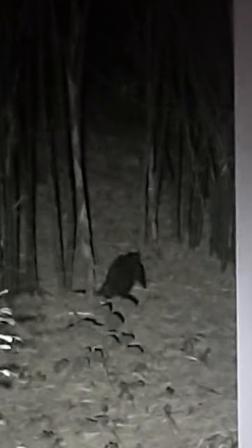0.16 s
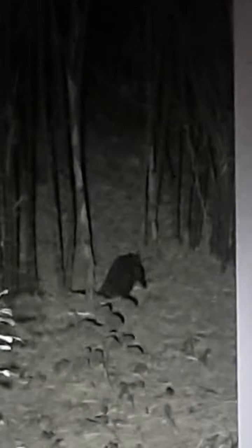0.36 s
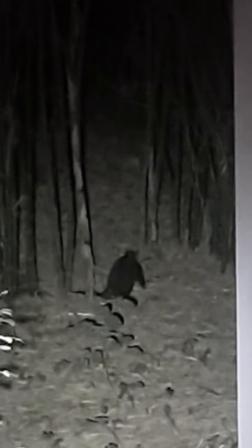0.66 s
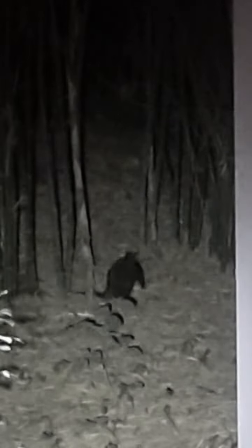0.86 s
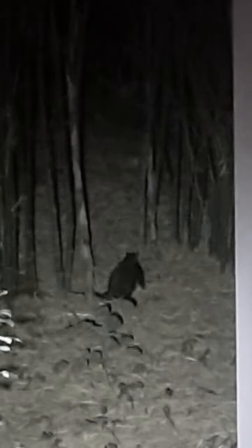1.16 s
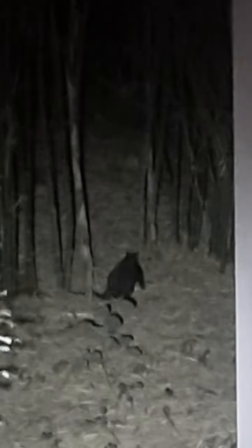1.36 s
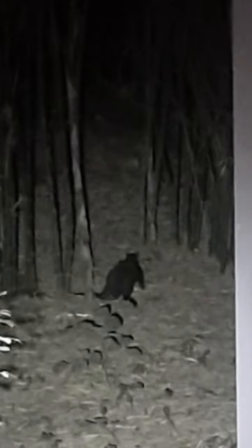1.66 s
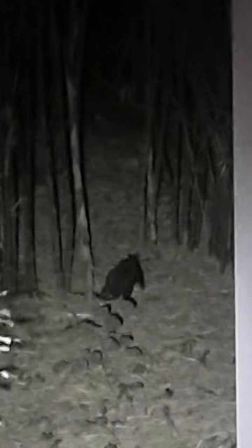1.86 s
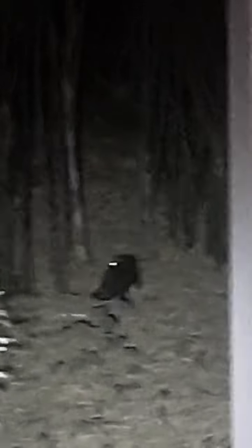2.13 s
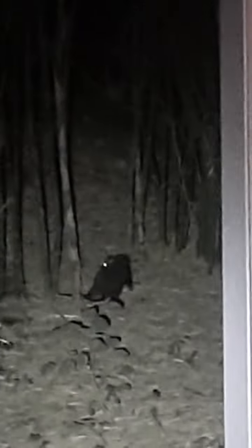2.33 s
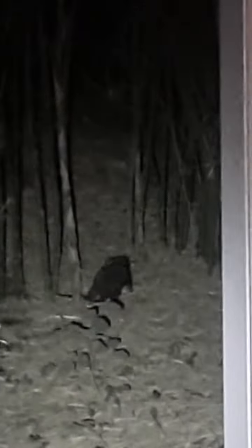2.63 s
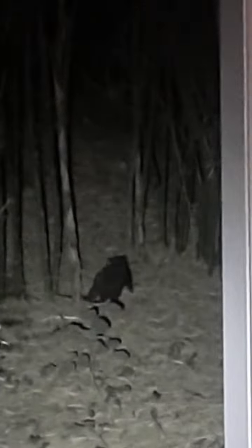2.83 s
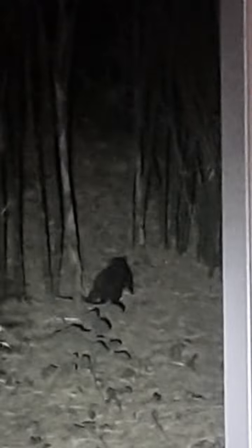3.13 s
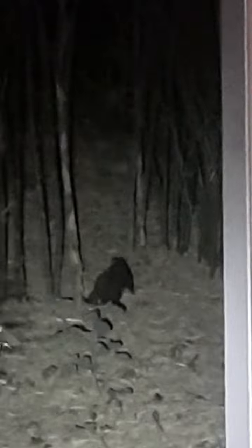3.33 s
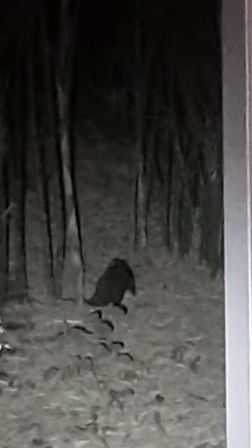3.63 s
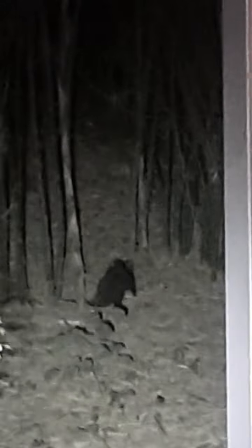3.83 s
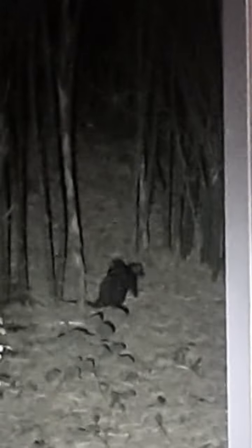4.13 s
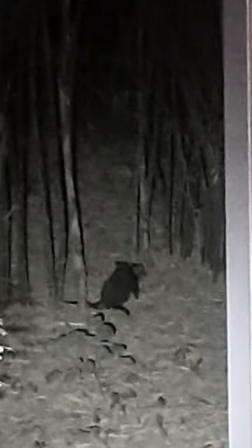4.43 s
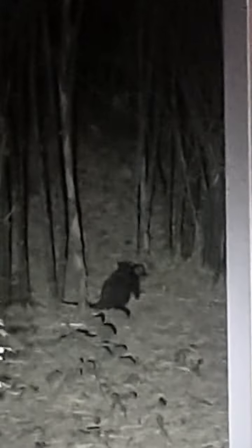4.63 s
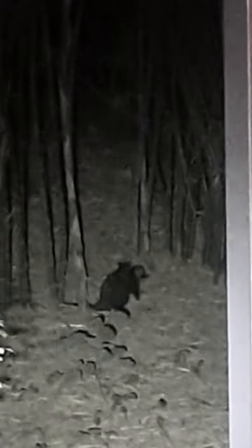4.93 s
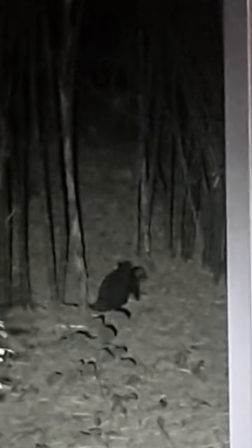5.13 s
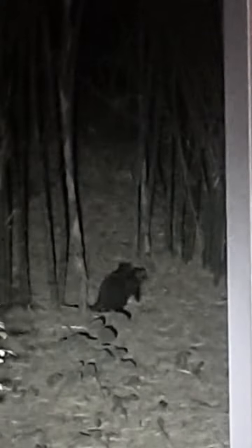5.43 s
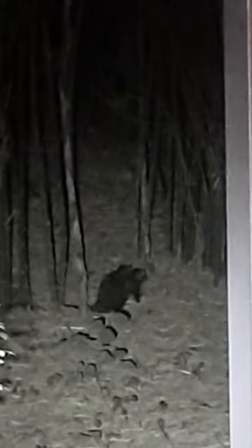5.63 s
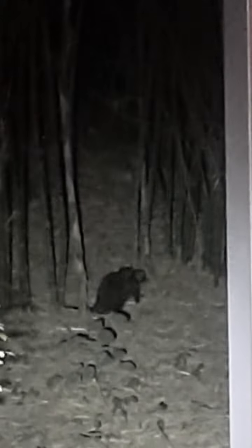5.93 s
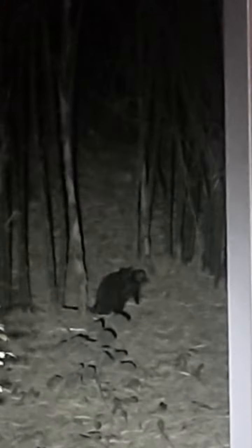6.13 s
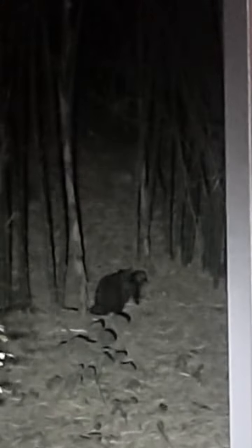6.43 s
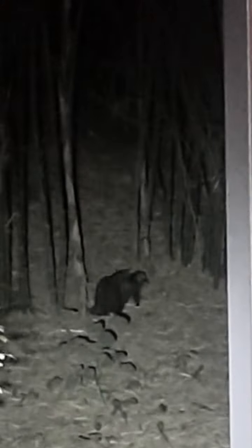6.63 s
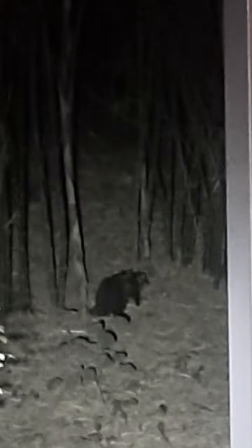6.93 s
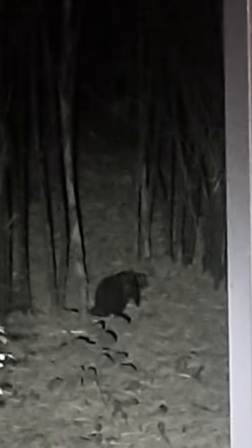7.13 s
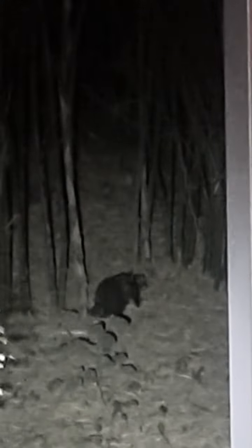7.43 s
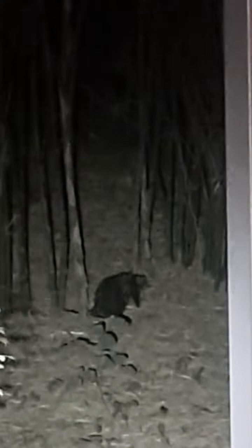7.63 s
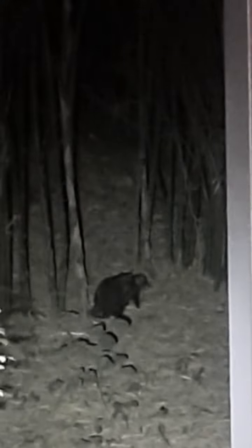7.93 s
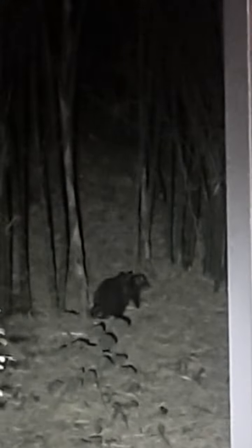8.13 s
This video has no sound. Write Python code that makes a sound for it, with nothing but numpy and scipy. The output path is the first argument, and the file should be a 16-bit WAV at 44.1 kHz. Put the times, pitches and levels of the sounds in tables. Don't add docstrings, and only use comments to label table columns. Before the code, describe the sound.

Outdoors at night, a small animal utters high, clear, warbling squeaks: first a few separate short calls with pauses, then a long, louder chatter near the end. Each yelp scoops upward and drops, echoing softly off the trees. Behind it are low distant traffic rumble and tyre hiss, faint steady insects and an occasional rustle of leaves. A handheld stereo microphone hears it at some distance.

```python
import sys
import numpy as np
from scipy import signal
from scipy.fft import rfft, irfft, next_fast_len
from scipy.io import wavfile
from scipy.ndimage import uniform_filter1d

SR = 44100
rng = np.random.default_rng(int(sys.argv[2]) if len(sys.argv) > 2 else 0)


def store_pcm(level_fs):
    pcm = np.round(np.clip(level_fs, -1, 1) * 32767).astype(np.int16)
    wavfile.write(sys.argv[1], SR, np.atleast_2d(pcm).T)


def level_to_linear(level):
    exponent = np.asarray(level, float) / 20
    return 10 ** exponent


N = 364707

# (time [s], roar level [dB], nearness as treble gain [dB])
ROAD_SWELLS = [(0.0, -71.5, -5.5), (0.14, -62, -2.5), (0.87, -71, 5.5), (1.06, -64, -2), (1.38, -68, 6),
               (1.77, -58, 3), (2.49, -62.5, -5.5), (2.74, -57.5, -5.5), (2.85, -64, 6.5),
               (2.97, -57.5, -12.5), (3.27, -67.5, -3), (3.38, -59, -15), (4.28, -55, -8.5),
               (5.13, -66.5, -8), (5.69, -58.5, -10), (7.58, -58.5, -14), (7.76, -63, -9.5),
               (8.27, -69, -6)]
# (frequency [Hz], density [dB per Hz])
ENGINE_RUMBLE = [(18, -17), (30, -10), (48, -2.5), (65, -2.5), (91, -6.5), (160, -19.5), (210, -78),
                 (350, -120)]
TYRE_DRONE = [(88, -15), (150, 0.5), (312, 3.5), (372, -3), (420, -2.5), (550, -33.5), (920, -120)]
TYRE_ROAR = [(250, -36), (430, -7), (538, 2), (684, -2), (790, -6.5), (880, -11), (1140, -25), (1940, -120)]
TYRE_HISS = [(530, -15.5), (900, -0.5), (1160, -1.5), (1260, -3.5), (1580, -2.5), (2300, -17),
             (2990, -62.5), (5060, -120)]
# (frequency [Hz], ring t60 [s], level [dB])
IDLE_HUM = (49, 1.6, -66.5)
# (time [s], length [s], depth [dB])
LULLS = [(0.284, 0.02, -13), (.72, 0.23, -4.5), (1.215, 0.076, -11.5), (1.47, 0.09, -13),
         (2.121, 0.035, -9), (2.537, 0.17, -9.5), (2.996, 0.058, -8), (3.301, 0.055, -7), (3.816, 0.58, -4),
         (5.105, 0.033, -13), (6.047, 0.094, -12), (6.316, .06, -8), (7.08, 0.083, -8.5),
         (8.27, 0.067, -9.5)]
# (time [s], length [s], swell [dB])
LORRY = (2.98, 1.14, 4.8)
ENGINE_DB, DRONE_DB = -53.5, -67
DRONE_PER_ROAR, DRONE_PER_NEAR, DRONE_PER_LULL = 0.46, 0.1, 0.37

# (frequency [Hz], density [dB per Hz])
NIGHT_SPECTRUM = [(1120, -26), (1900, -15.5), (2290, -15.5), (2900, -9.5), (3200, -18), (3820, -4),
                  (3980, -25.5), (4110, -9.5), (4360, -56), (5110, -25), (5910, -18.5), (6440, -8),
                  (7440, -1), (8220, -12), (9190, -21), (11900, -65), (20200, -120)]
NIGHT_DB = -66
# (centre [Hz], spread [Hz], pulse rate [per s], ring t60 [s], level [dB])
CHORUSES = [
    (6980, 550, 37, 0.071, -78),
    (3554, 190, 27, 0.06, -79),
    (2815, 130, 46, 0.022, -80.5),
]
# (time [s], length [s], level [dB])
HIGH_CHIRPS = [(.09, 0.16, -88), (.83, 0.17, -84), (1.48, 0.12, -84.5), (2.426, 0.17, -92),
               (3.2, 0.11, -91), (3.96, 0.14, -88), (4.618, .13, -87), (5.358, .13, -88), (5.97, .12, -110),
               (6.62, 0.32, -80), (7.298, 0.087, -95), (8.03, 0.16, -88)]
# (time [s], length [s], level [dB])
RUSTLES = [
    (4.15, 0.64, -64),
    (5.3, 0.81, -60),
    (6.28, 0.023, -78),
]
# (frequency [Hz], density [dB per Hz])
LEAF_SPECTRUM = [(1200, -47), (1800, 7), (2600, 3), (3400, 2), (5000, -8), (6500, -36)]

# (frequency [Hz], gain [dB])
THROAT = [(1200, -50), (1850, -23.5), (2150, -14), (2700, -14), (3200, -8.5), (3750, 2), (4400, 1),
          (4750, -11), (5500, -3), (6050, -5.5), (7620, -6.5), (9100, -34.5), (9900, -44), (11500, -56),
          (15000, -55)]
# (time [s], climb length [s], start pitch [Hz], crest
# pitch [Hz], level [dB])
YELPS = [(.7, 0.057, 1697, 2164, -49), (.79, 0.082, 1733, 2107, -41.5),
         (.945, 0.069, 1257, 1816, -41.5), (1.587, 0.033, 1545, 1676, -50),
         (1.636, 0.045, 1752, 2264, -44), (1.7, 0.021, 2083, 2080, -39.5),
         (1.755, 0.021, 1990, 1884, -38), (1.788, .018, 1780, 1655, -39),
         (1.819, 0.052, 1387, 1812, -36), (1.999, .12, 1066, 1225, -50),
         (2.612, .035, 1420, 1648, -53), (2.642, 0.044, 1725, 2197, -42.5),
         (2.757, 0.07, 1496, 2052, -39), (2.875, .07, 1120, 1250, -45),
         (2.981, 0.054, 1070, 1167, -46.5), (3.061, 0.069, 1108, 1328, -48),
         (4.467, 0.05, 1368, 2101, -39.5), (5.486, 0.064, 1345, 2039, -40),
         (5.578, 0.022, 1873, 1713, -36.5), (5.623, 0.062, 1660, 1917, -34.5),
         (5.705, .018, 1494, 1393, -44.5), (5.778, 0.069, 1078, 1316, -47.5),
         (6.4, 0.084, 1245, 1937, -42), (6.507, 0.081, 1767, 1847, -33.5),
                 (6.644, 0.072, 1256, 1817, -35), (6.791, 0.071, 1160, 1838, -36.5),
                 (6.902, 0.096, 1460, 1887, -35.5), (7.04, 0.1, 1290, 1890, -35.5),
                 (7.227, 0.074, 1115, 1375, -44), (7.299, .035, 1449, 1460, -38.5),
                 (7.337, 0.056, 1473, 1655, -40), (7.48, 0.08, 1534, 1895, -34),
                 (7.672, 0.077, 1299, 1892, -32), (7.804, 0.078, 1428, 1920, -31),
                 (7.922, 0.028, 1296, 1225, -39), (7.963, .065, 1228, 1322, -39.5)]
# (time [s], pitch [Hz], level [dB])
CALL_ENDS = [
    (1.06, 1046, -43),
    (2.155, 1250, -85),
    (2.735, 1630, -64),
    (3.201, 1007, -93),
    (4.575, 1436, -69),
    (5.919, 1137, -74),
    (7.655, 1086, -73),
    (8.13, 1102, -60),
]
# (straight-path level [dB], shadow around 5.5 kHz [dB])
HEAD_TURN = [
    (-8, -5),
    (-5, -4),
    (-5, -3),
    (-5.5, -3),
    (-4, -1),
    (-3, 0),
    (-2, 0),
    (-2, 0),
]
# (share of time [0-1], share of pitch step [0-1], level [dB], brightness [dB per octave])
CLIMB = [(.3, .58, -9, 3.3), (.62, .93, -2.5, -0.8), (0.999, 1, -4, 6.5)]
DROP_SHARE, DROP_MOST_S, DROP_DONE, DROP_DB, DROP_BRIGHT_DB = 0.55, 0.033, 0.75, -10.5, 5.5
ONSET_DB, ONSET_DB_PER_OCTAVE, SLACK_DULL_DB = -4.5, -15.5, -7.5
EFFORT_DB, BRIGHT_PER_DB, FIRST_DULL_DB = -41.5, 0.25, -3

# (frequency [Hz], t60 [s])
WOOD_T60 = [(1500, 1), (3500, 0.45), (6000, 0.43), (9000, 0.29)]
# (frequency [Hz], correlation [-1 to 1])
PORT_LIKENESS = [(60, 1), (160, 0.78), (440, 0.91), (1190, 0.35), (3230, 0.11), (8740, -0.16)]
# (frequency [Hz], left minus right [dB])
PORT_COLOUR = [(60, 1), (100, 4.5), (180, 1.5), (320, 6), (550, 4.0), (960, 2), (1660, 3), (2890, -2),
               (5030, -1.5), (8740, 15.5)]


def rms_one(x):
    return x / np.sqrt(np.mean(x ** 2) + 1e-20)


def in_time(rows):
    s, *columns = np.transpose(rows)
    return [np.interp(np.arange(N) / SR, s, c) for c in columns]


def at_hz(points, hz):
    table_hz, values = np.array(points).T
    return np.interp(np.log(np.maximum(hz, 1)), np.log(table_hz), values)


def drift(rate):
    r = np.exp(-80 * np.pi * rate / SR)
    noise = rng.standard_normal(N // 40 + 2002)
    slow = signal.lfilter([1], [1, -2 * r, r * r], noise)[2000:]
    return np.interp(np.arange(N) / 40, np.arange(len(slow)), rms_one(slow))


def ring(clicks, hz, t60):
    r, w = level_to_linear(-60 / (t60 * SR)), 2 * np.pi * hz / SR
    return signal.lfilter([0, np.sin(w)], [1, -2 * r * np.cos(w), r * r], clicks + 1e-18)


def coloured(spectrum, patchy_db):
    size = next_fast_len(N)
    hz = np.arange(size // 2 + 1) * SR / size
    mid, side = rfft(rng.standard_normal((2, size)))
    alike = np.clip(at_hz(PORT_LIKENESS, hz), -1, 1)
    pair = np.sqrt(1 + alike) * mid + np.sqrt(1 - alike) * side * [[1], [-1]]
    noise = irfft(pair * level_to_linear(at_hz(spectrum, hz)), size)[:, :N]
    return rms_one(noise * level_to_linear(patchy_db * drift(6.4)))


def gated(events, taper):
    gate = np.zeros(N)
    for s, length, level_db in events:
        shape = signal.windows.tukey(int(length * SR), taper)
        start = int(s * SR)
        gate[start:start + len(shape)] = level_to_linear(level_db) * shape
    return gate


def road():
    time = np.arange(N) / SR
    roar_db, near_db = in_time(ROAD_SWELLS)
    lull_db = sum(db * np.exp(-((time - s) / length) ** 2) for s, length, db in LULLS)
    drone_db = DRONE_DB + DRONE_PER_ROAR * (roar_db - roar_db.mean())
    drone_db += DRONE_PER_NEAR * (near_db - near_db.mean()) + DRONE_PER_LULL * lull_db
    lorry_s, lorry_length, lorry_db = LORRY
    drone_db += lorry_db * np.exp(-((time - lorry_s) / lorry_length) ** 2)
    hum_hz, hum_t60, hum_db = IDLE_HUM
    hum = level_to_linear(hum_db) * rms_one(ring(rng.standard_normal(N), hum_hz, hum_t60))
    rumble = level_to_linear(ENGINE_DB + lull_db) * coloured(ENGINE_RUMBLE, patchy_db=1.25)
    drone = level_to_linear(drone_db) * coloured(TYRE_DRONE, patchy_db=1.8)
    roar = level_to_linear(roar_db - 0.3) * coloured(TYRE_ROAR, patchy_db=1.7)
    hiss = level_to_linear(roar_db + near_db + 1.5) * coloured(TYRE_HISS, patchy_db=1.43)
    return hum + rumble + drone + roar + hiss


def chorus(hz, spread_hz, per_s, t60, level_db, count=7):
    out = 0
    teeth = rng.standard_normal((2, N)) * (rng.random((2, N)) < 0.1)
    offsets = np.linspace(-1.5, 1.5, count)
    paces = rng.normal(0, 0.15, count)
    starts = rng.random(count)
    for k, (offset, pace, start) in enumerate(zip(offsets, paces, starts)):
        stroke = np.sin(np.pi * (per_s * (1 + pace) * np.arange(N) / SR + start)) ** 2
        scrape = np.roll(teeth, 5000 * k, axis=1) * stroke
        out = out + ring(scrape, hz + spread_hz * offset, t60) * np.exp(-offset ** 2 / 2)
    return level_to_linear(level_db) * rms_one(out)


def far_night():
    far = sum(chorus(*row) for row in CHORUSES)
    far = far + level_to_linear(NIGHT_DB) * coloured(NIGHT_SPECTRUM, patchy_db=0.25)
    return signal.sosfilt(signal.cheby2(8, 30, 9300, fs=SR, output="sos"), far)


def high_insect(hz=10500, t60=0.005):
    scrape = ring(ring(rng.standard_normal((2, N)), hz, t60), hz, t60)
    return gated(HIGH_CHIRPS, taper=0.56) * rms_one(scrape)


def leaves():
    return gated(RUSTLES, taper=0.74) * coloured(LEAF_SPECTRUM, patchy_db=4.0)


def wood(x, near_db=-8, near_s=0.008, far_db=-4.5, rise_s=0.015):
    lag = np.arange(int(1.2 * SR)) / SR
    tail = 0
    for low in 1000 * 2 ** np.arange(0, 3.5, 0.5):
        sos = signal.butter(2, [low, low * np.sqrt(2)], "band", fs=SR, output="sos")
        band = signal.sosfilt(sos, rng.standard_normal((2, len(lag))))
        tail = tail + band * level_to_linear(-60 * lag / at_hz(WOOD_T60, low * 1.2))
    tail = tail * (1 - np.exp(-lag / rise_s))
    trunks = rng.standard_normal((2, len(lag))) * (rng.random((2, len(lag))) < 0.04)
    ahead = len(lag) // 200
    trunks[1, :ahead] = trunks[0, :ahead]
    cloud = trunks * np.exp(-lag / near_s)
    echo = level_to_linear(far_db) * tail / np.sqrt(np.sum(tail ** 2))
    echo += level_to_linear(near_db) * cloud / np.sqrt(np.sum(cloud ** 2, axis=1, keepdims=True))
    return signal.fftconvolve(x[None], echo, axes=1)[:, :N]


def phrase(yelps, end):
    rows = []
    followers = yelps[1:] + [(end[0], 0, end[1])]
    for (s, climb_s, low_hz, crest_hz, db), (next_s, _, next_hz, *_) in zip(yelps, followers):
        crest_s = min(s + climb_s, next_s - 0.002)
        tilt = BRIGHT_PER_DB * (db - EFFORT_DB) + FIRST_DULL_DB * (not rows)
        onset_db = ONSET_DB + ONSET_DB_PER_OCTAVE * abs(np.log2(crest_hz / low_hz))
        rows.append((s, low_hz, db + onset_db, tilt))
        for u, v, lift_db, bright in CLIMB:
            climb_hz = low_hz + v * (crest_hz - low_hz)
            rows.append((s + u * (crest_s - s), climb_hz, db + lift_db, bright + tilt))
        drop_s = min(DROP_SHARE * (next_s - crest_s), DROP_MOST_S)
        drop_hz = crest_hz + DROP_DONE * (next_hz - crest_hz)
        rows.append((crest_s + drop_s, drop_hz, db + DROP_DB, DROP_BRIGHT_DB + tilt))
    return np.transpose(rows + [(*end, 0)])


def squeaks(wobble=0.003, flutter_db=2.5, hoarse=0.15, glide_hoarse=0.45, low_hoarse=0.15, climb_hoarse=0.25):
    out, time = np.zeros((2, N)), np.arange(N) / SR
    shake, flutter = drift(39.4), drift(67)
    low_pass = signal.butter(4, 400, fs=SR, output="sos")
    breath = rms_one(signal.sosfilt(low_pass, rng.standard_normal(N)))
    order = np.arange(1, 11)[:, None]
    for before, end, (straight_db, shadow_db) in zip([(0,)] + CALL_ENDS, CALL_ENDS, HEAD_TURN):
        yelps = [y for y in YELPS if before[0] < y[0] < end[0]]
        s, pitch_hz, level_db, bright = phrase(yelps, end)
        span = slice(int(s[0] * SR), int(s[-1] * SR))
        pitch = uniform_filter1d(np.interp(time[span], s, pitch_hz), size=350, mode="nearest")
        glide = np.gradient(np.log(pitch)) * SR / 10
        falling = np.clip(-glide, 0, 1)
        rising = np.clip(glide, 0, 1)
        slack = np.clip((1500 - pitch) / 400, 0, 1)
        rough = hoarse + glide_hoarse * falling + low_hoarse * slack + climb_hoarse * rising
        phase = 2 * np.pi * np.cumsum(pitch * (1 + wobble * shake[span])) / SR
        phase += rough * breath[span] / 3
        tilt = np.interp(time[span], s, bright) + SLACK_DULL_DB * slack
        gain = level_to_linear(at_hz(THROAT, order * pitch) + tilt * np.log2(order * pitch / 4000))
        gain *= level_to_linear(shadow_db * np.exp(-(np.log2(order * pitch / 5600) / 0.079) ** 2))
        gain /= np.sqrt(np.sum(gain ** 2, axis=0) / 2)
        edge = signal.windows.tukey(len(pitch), 600 / len(pitch))
        level = level_to_linear(np.interp(time[span], s, level_db) + flutter_db * flutter[span])
        call = np.sum(gain * np.sin(order * phase), axis=0) * level * edge
        out[:, span] = call * level_to_linear(np.array([[0], [straight_db]]))
    return out


def scene():
    background = road() + far_night() + high_insect() + leaves()
    voice, direct = squeaks()
    undergrowth = signal.butter(2, 6200, fs=SR, output="sos")
    return background + wood(voice) + signal.sosfilt(undergrowth, direct)


def top_cut(x):
    return signal.sosfilt(signal.butter(12, 15750, fs=SR, output="sos"), x)


def record(dry):
    size = next_fast_len(N)
    tilt_db = at_hz(PORT_COLOUR, np.arange(size // 2 + 1) * SR / size) / 2
    ports = irfft(rfft(dry, size) * level_to_linear(np.array([tilt_db, -tilt_db])), size)[:, :N]
    ports = signal.sosfilt(signal.butter(8, 39, "high", fs=SR, output="sos"), ports)
    hiss = level_to_linear(-81.5) * rng.standard_normal((2, N))
    return top_cut(ports + hiss)


dry = scene()
out = record(dry)
store_pcm(out)
```